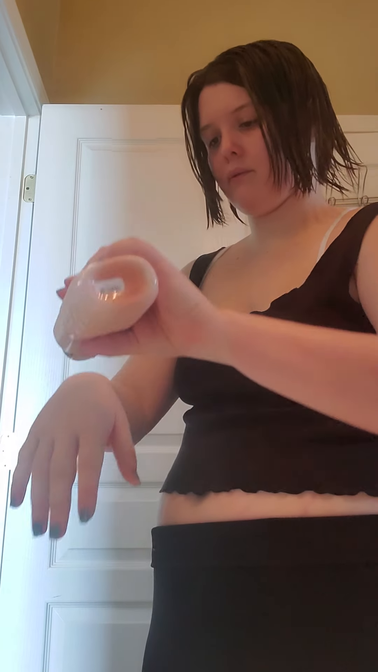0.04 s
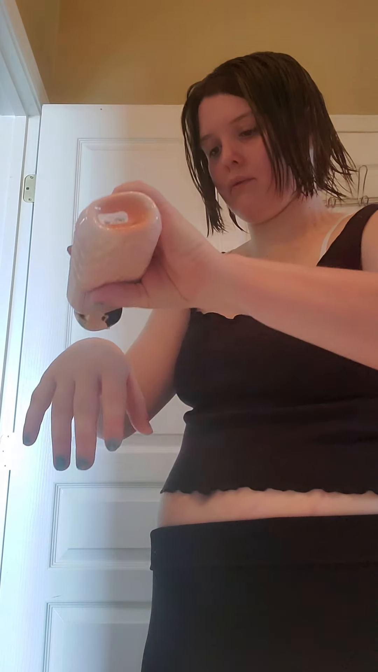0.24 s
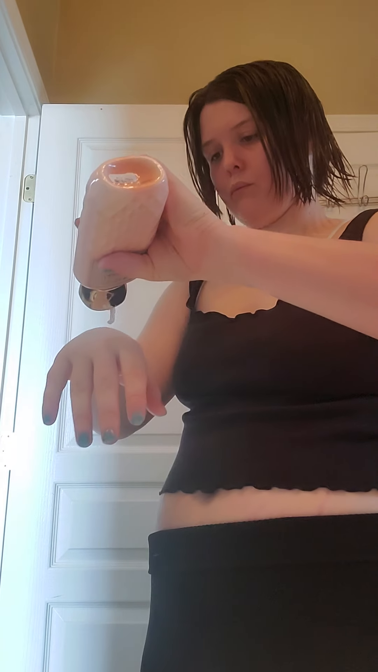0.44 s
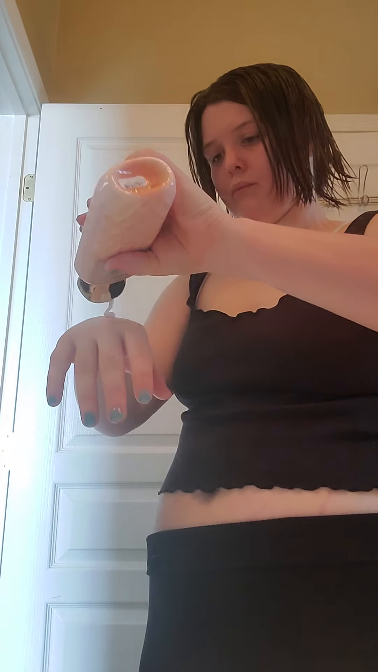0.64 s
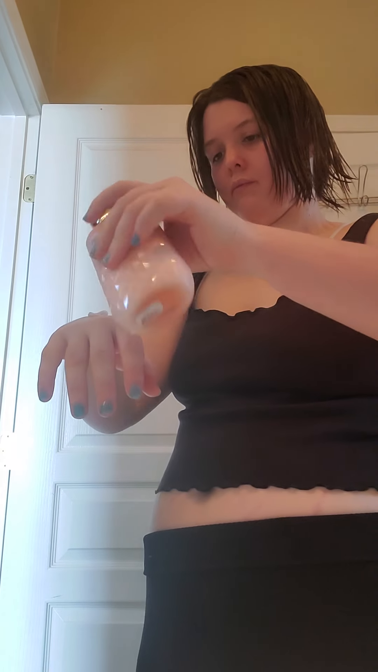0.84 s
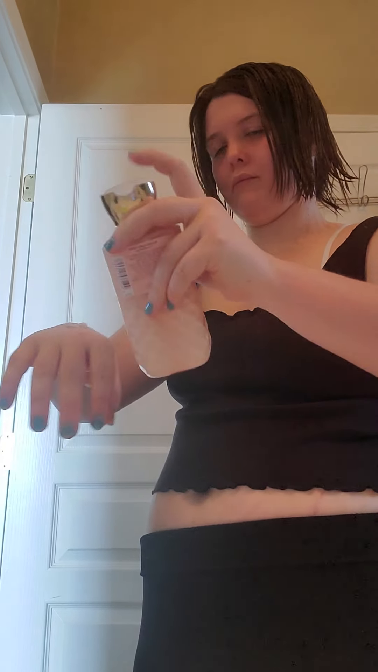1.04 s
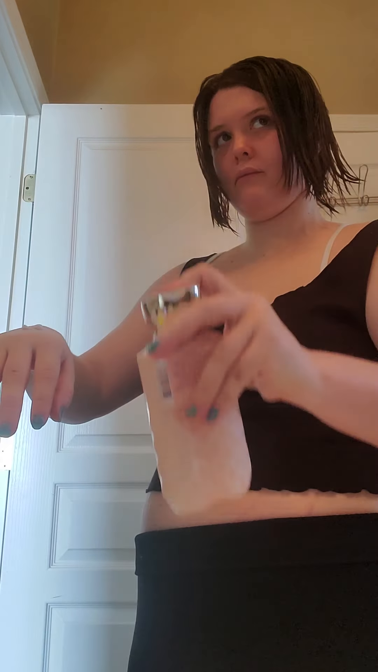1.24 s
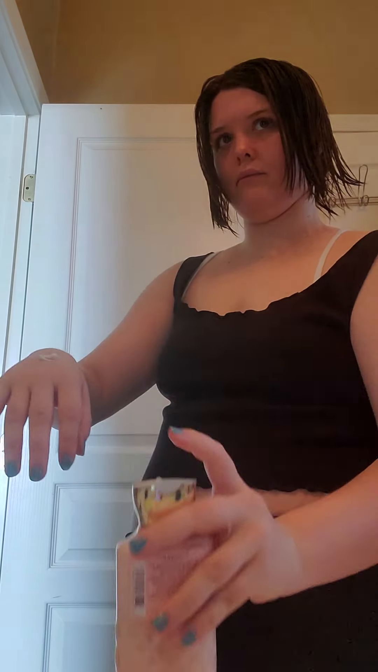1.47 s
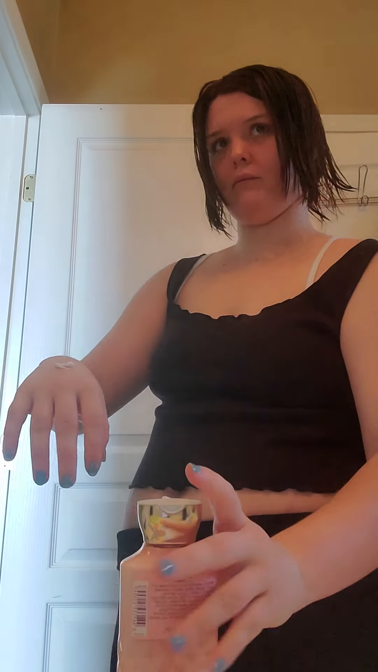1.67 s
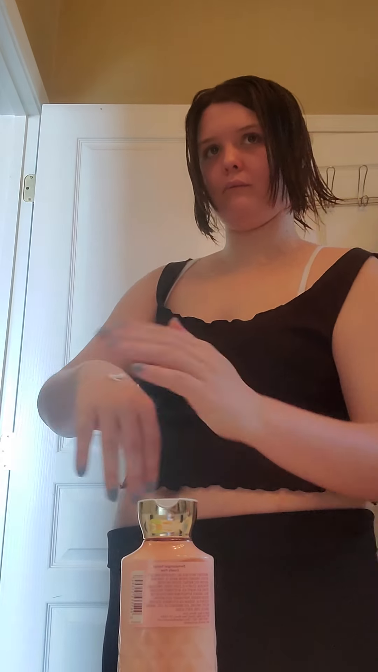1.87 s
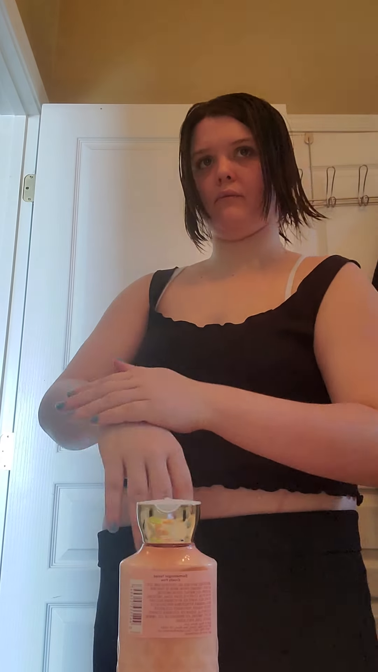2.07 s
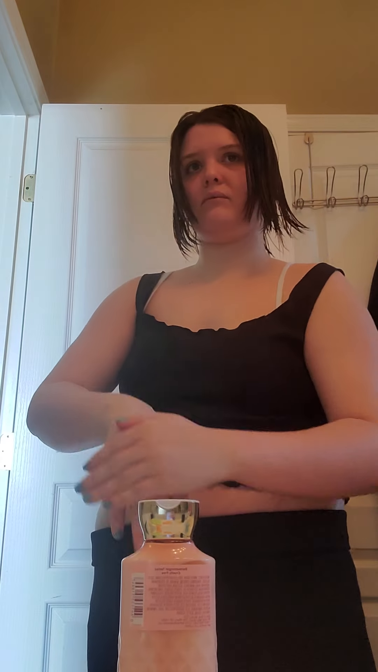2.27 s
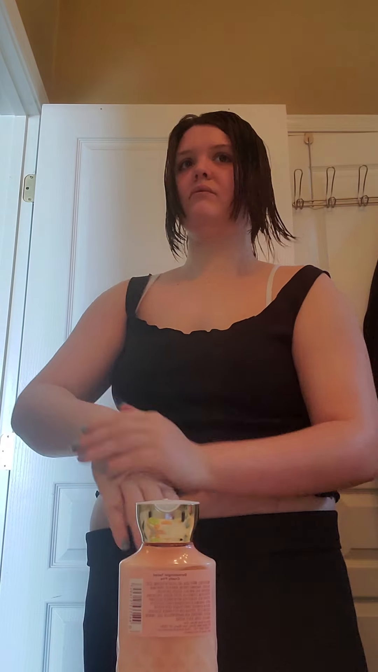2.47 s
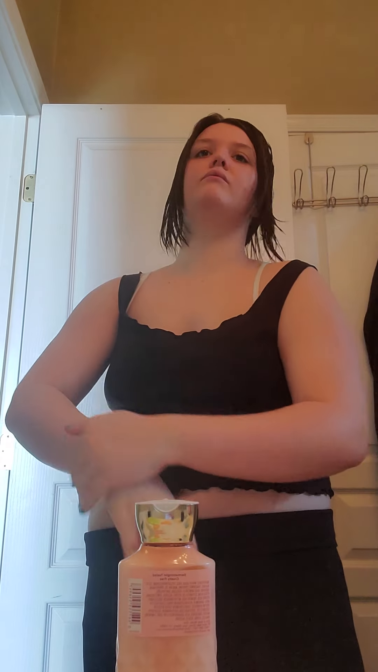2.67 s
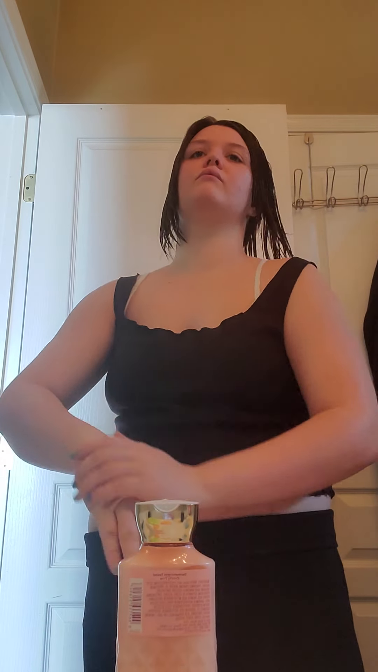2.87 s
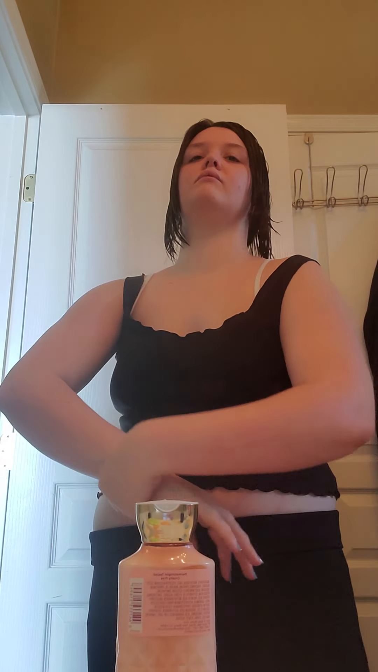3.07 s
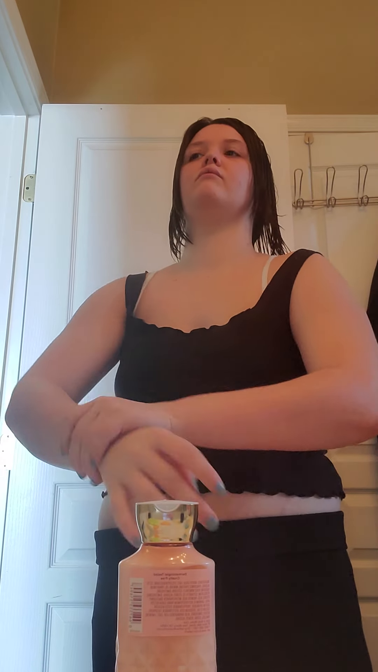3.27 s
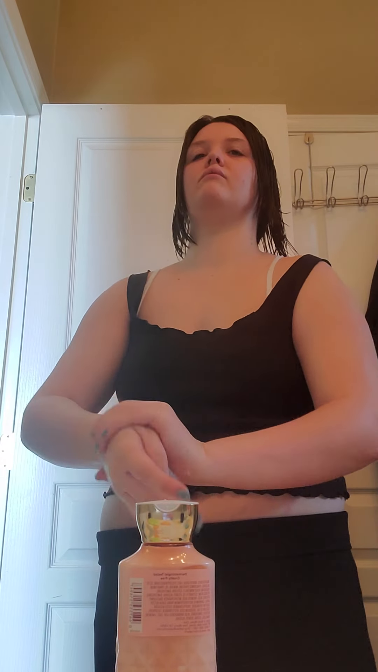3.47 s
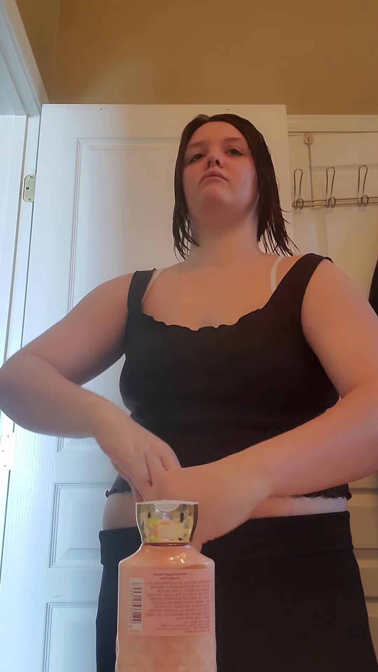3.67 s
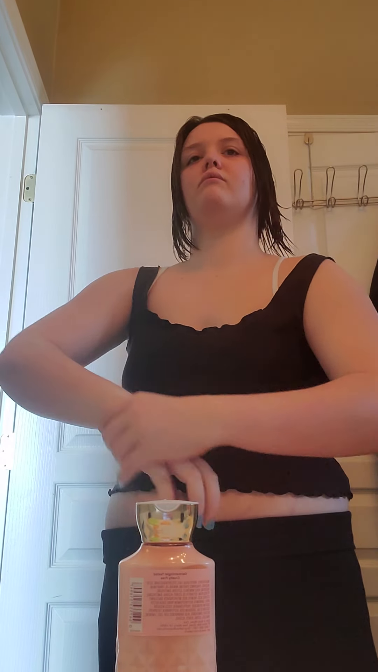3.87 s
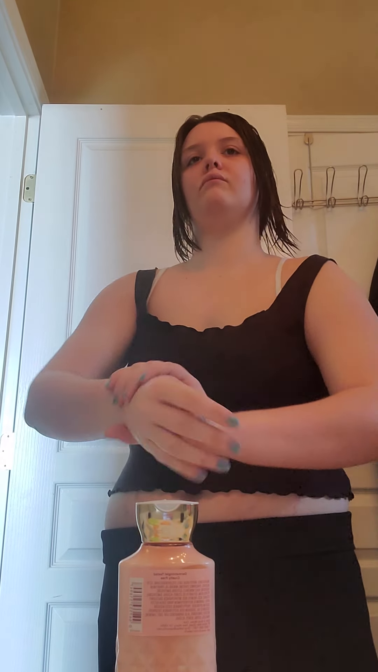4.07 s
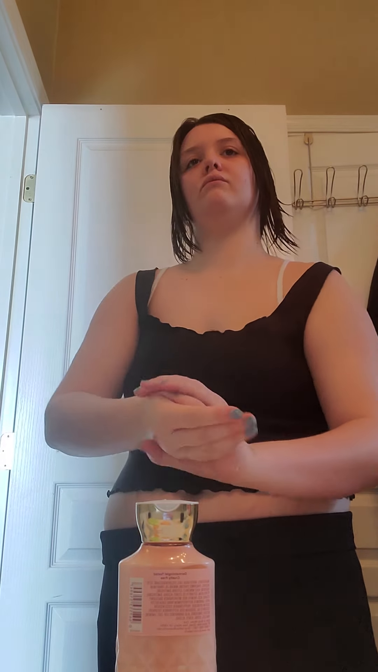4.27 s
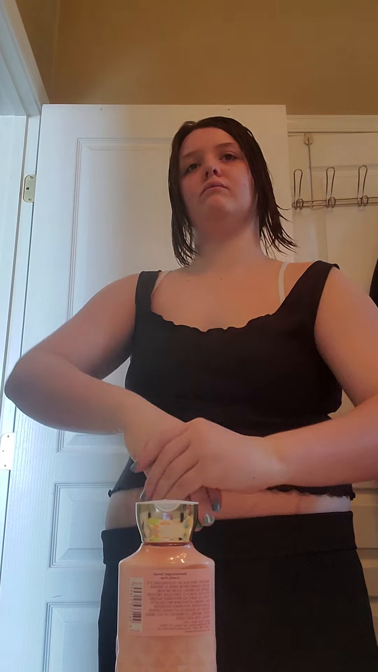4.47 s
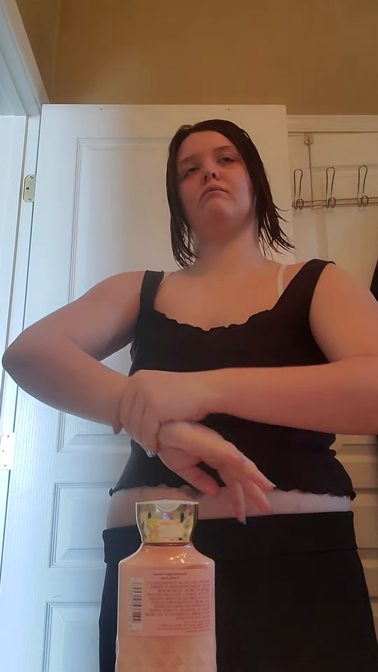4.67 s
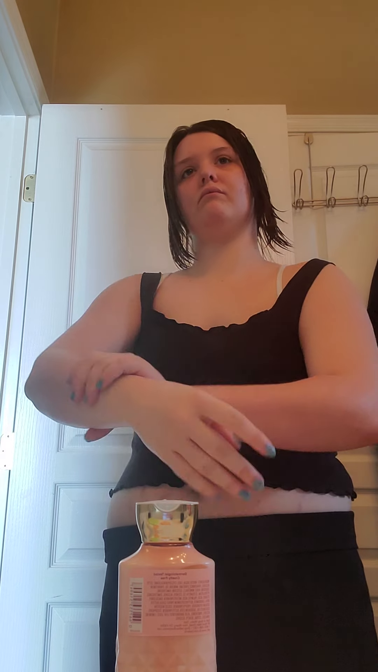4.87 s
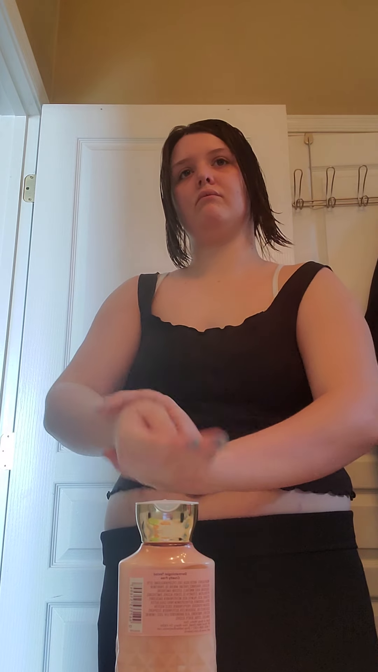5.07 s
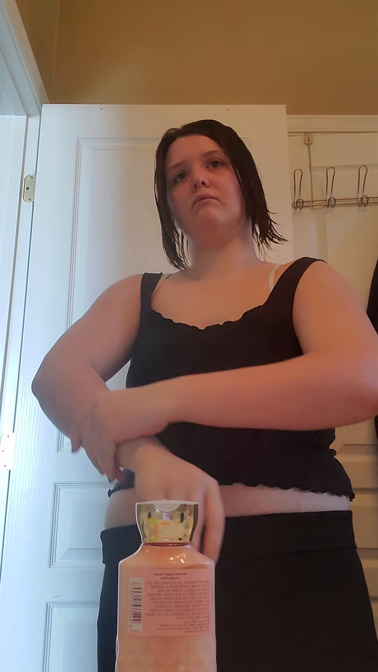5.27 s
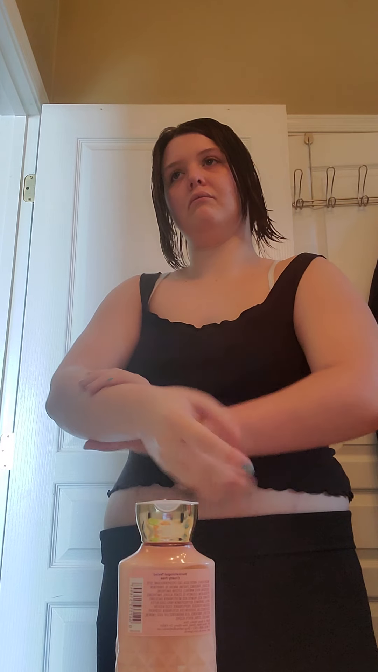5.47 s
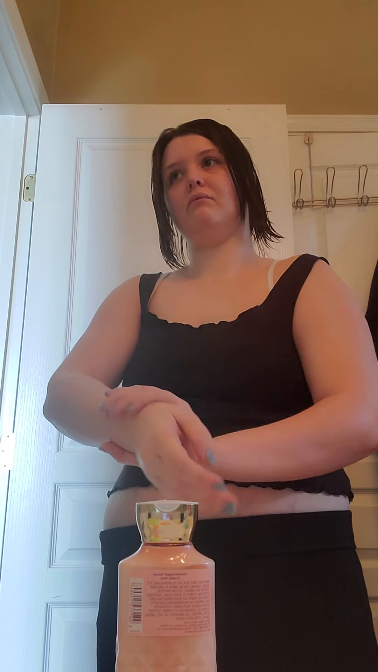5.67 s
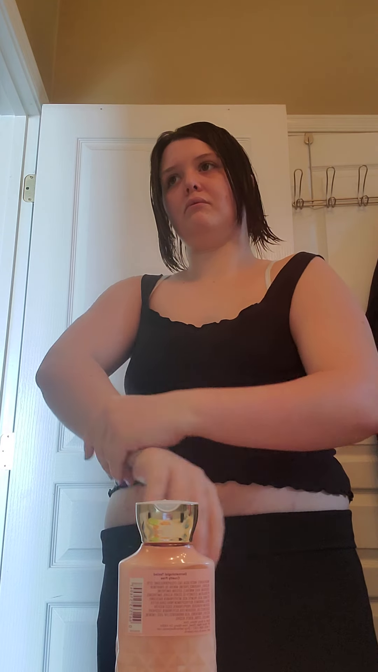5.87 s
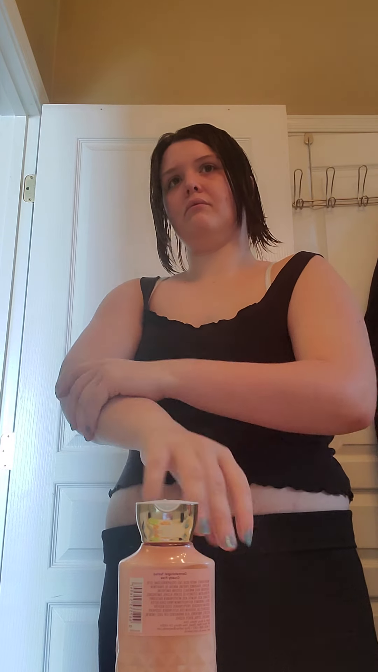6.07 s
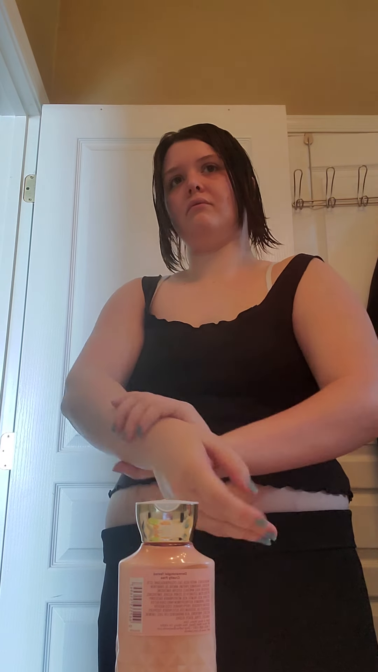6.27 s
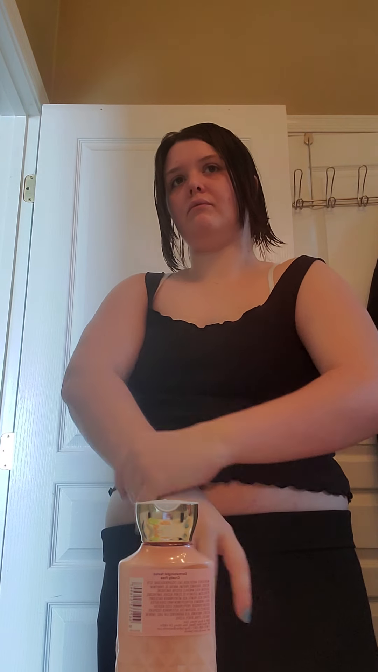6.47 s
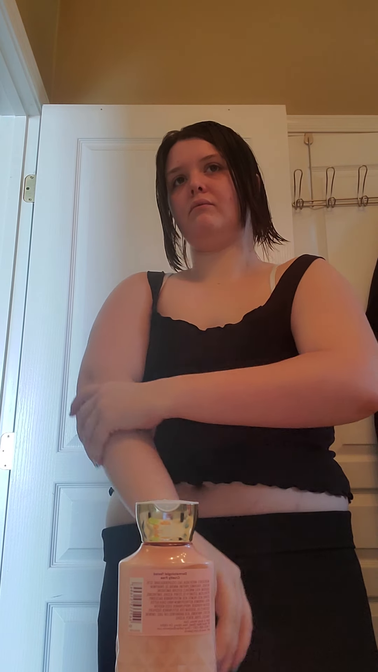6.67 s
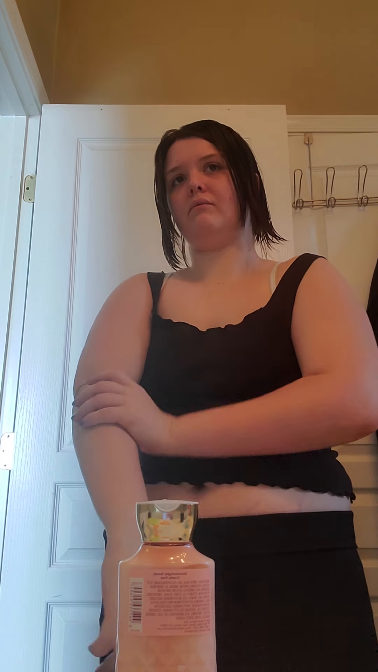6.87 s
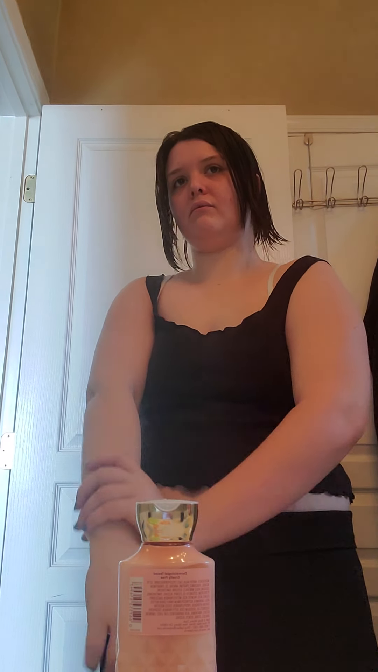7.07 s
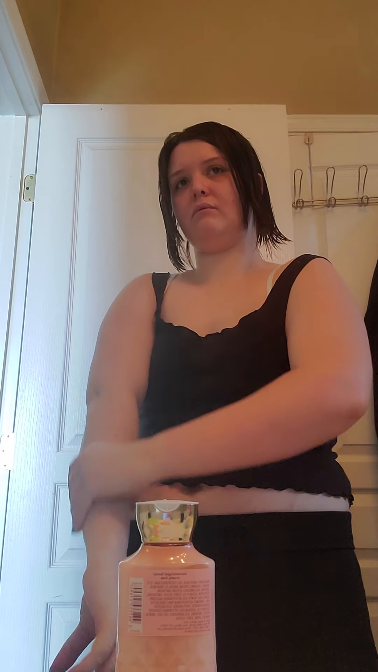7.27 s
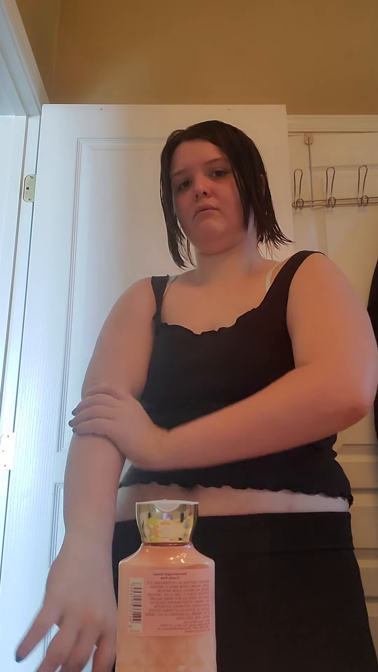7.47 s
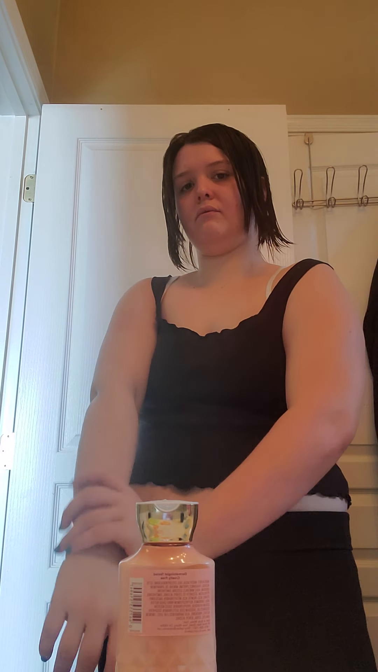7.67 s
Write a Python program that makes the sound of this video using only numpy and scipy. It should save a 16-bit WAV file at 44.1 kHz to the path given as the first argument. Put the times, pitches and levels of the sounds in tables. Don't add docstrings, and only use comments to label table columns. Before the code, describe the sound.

A soft grip rustle and wet pop, then a breathy gulp of air into a plastic bottle and a bright cap click. The bottle lands hard on a resonant countertop and wobbles to rest. Moist skin hisses and whistles in rhythmic strokes, first short over the hand, then longer up the arm. Near microphone, short tiled echo, low fan drone.

```python
import sys
import numpy as np
from scipy import signal
from scipy.fft import rfft, irfft, next_fast_len
from scipy.io import wavfile
from scipy.ndimage import uniform_filter1d, map_coordinates

SR = 44100
rng = np.random.default_rng(int(sys.argv[2]) if len(sys.argv) > 2 else 0)


def rack_gain(trim_db):
    fader = np.asarray(trim_db, float)
    return 10 ** (fader / 20)


def generate_wav(signal):
    frames = np.transpose(np.atleast_2d(signal))
    scaled = np.clip(frames, -1, 1) * 32767
    pcm = np.round(scaled).astype(np.int16)
    wavfile.write(sys.argv[1], SR, pcm)


N = 340893
T = np.arange(SR // 2) / SR


def unit(x):
    return x / np.sqrt(np.mean(x ** 2) + 1e-20)


def along(points, hz):
    f, value = np.transpose(points)
    return np.interp(np.log(hz + 1), np.log(f + 1), value)


def wobble(rate):
    knots = rng.standard_normal(int(N * rate / SR) + 4)
    return map_coordinates(knots, [np.arange(N) * rate / SR])


def filtered(x, response):
    m = next_fast_len(N + SR // 2)
    spectrum = rfft(x, m) * response(np.fft.rfftfreq(m, 1 / SR))
    return irfft(spectrum, m)[..., :N]


def above(x, hz):
    return signal.sosfilt(signal.butter(2, hz, "high", fs=SR, output="sos"), x)


def rush(gain, patchy_db, size=(5, 5)):
    # [f/Hz, likeness 0 to 1]
    likeness = [(60, .97), (130, .97), (290, .94), (640, .6), (1410, .08), (3100, .14), (6820, .1),
                (15000, .02)]
    hz, s, z = signal.stft(rng.standard_normal((2, N)), SR, nperseg=512)
    patches = uniform_filter1d(rng.standard_normal(z.shape[1:]), size[0], axis=0)
    patches = uniform_filter1d(patches, size[1], axis=1)
    turn = np.arccos(np.clip(along(likeness, hz), -1, 1))[:, None] / 2
    mid, side = z[0] * np.cos(turn), z[1] * np.sin(turn)
    shaped = np.array([mid + side, mid - side]) * gain(hz[:, None], s) * rack_gain(patchy_db * unit(patches))
    return unit(signal.istft(shaped, SR, nperseg=512)[1][:, :N])


def ring(modes, attack, late=0):
    t = np.maximum(T - late, 0)
    tones = sum(rack_gain(db - 60 * t / t60) * np.sin(2 * np.pi * hz * t) for hz, db, t60 in modes)
    return tones * (1 - np.exp(-t / attack)) ** 2


def add(track, s, sound):
    start = round(s * SR)
    track[..., start:start + len(T)] += sound


def fan():
    # [f/Hz, width/Hz, level/dB]
    air_modes = [(29.4, 12, -13), (65, 11.5, -3.5), (81, 21, -22), (112.3, 5.8, -6), (120, 6.3, -5.5),
                 (158, 9.2, -21.5), (184, 9, -22), (285, 7.7, -15.5), (365, 16, -18), (440, 27, -17.5)]
    # [f/Hz, level per Hz/dB]
    air_color = [(13, -41), (22, -11), (118, 1), (143, -4), (173, -13), (235, -16), (374, -23), (766, -30),
                 (855, -24), (1400, -34.5), (2010, -22.5), (6550, -44.5), (8620, -51), (15800, -39)]
    hum_hz, hum_db = 118.5, -1
    modes = lambda f: sum(rack_gain(db) * f * w / np.hypot(c * c - f * f, f * w) for c, w, db in air_modes) ** 2
    mid, side = unit(filtered(rng.standard_normal((2, N)), modes)) * rack_gain([[0], [-20]])
    hum_phase = 2 * np.pi * hum_hz * np.arange(N) / SR + 0.78 * wobble(4)
    mid = mid + rack_gain(hum_db + 0.83 * wobble(1.5)) * np.sin(hum_phase)
    side = side - mid * np.mean(mid * side) / np.mean(mid ** 2)
    air = rush(lambda hz, s: rack_gain(along(air_color, np.maximum(hz, 200))) * (hz > 140), patchy_db=.6)
    return rack_gain(-51.0) * np.array([np.roll(mid + side, shift=3), mid - side]) + rack_gain(-64.0) * air


def tiles(x, gap, lo_hz):
    # [f/Hz, t60/s]
    dying = [(120, .25), (400, 0.26), (1200, 0.23), (4000, 0.2), (12000, 0.11)]
    hz, t, z = signal.stft(rng.standard_normal((2, SR // 2)), SR, nperseg=256)
    fading = z * rack_gain(-60 * t / along(dying, hz)[:, None]) * (hz[:, None] > lo_hz)
    tail = signal.istft(fading, SR, nperseg=256)[1]
    delayed = np.pad(x, (round(gap * SR), 0))[None]
    return signal.fftconvolve(delayed, tail / np.linalg.norm(tail[0]), axes=1)[:, :N]


def brushes():
    # [middle t/s, length/s, level/dB, f/Hz]
    brush_rows = [(0.044, 0.075, -67, 6760), (1.02, 0.03, -53, 214.6), (1.026, 0.044, -57.5, 655),
                  (1.122, 0.037, -50, 210), (1.204, .04, -55, 197.6), (3.417, 0.044, -60, 1026),
                  (3.453, 0.045, -55, 600), (3.451, 0.13, -59.5, 431), (3.55, 0.15, -67, 837),
                  (3.605, .07, -70, 600), (3.803, .1, -63.5, 420), (4.119, .09, -61, 570),
                  (4.246, .06, -67, 575), (4.47, 0.11, -55.5, 420), (4.452, .06, -63, 1017),
                  (4.648, .18, -61.5, 405), (4.89, .11, -60, 400), (4.948, .09, -66.5, 590),
                  (7.241, .05, -70, 1530), (7.3, 0.17, -73.5, 1250), (7.46, 0.081, -61, 968),
                  (7.646, 0.075, -65, 1400), (7.65, .13, -59, 470)]
    breadth = .14
    out, knots = np.zeros((2, N + SR)), rng.standard_normal((len(brush_rows), 4, 400))
    for (s, length, db, hz), row in zip(brush_rows, knots):
        a, b, c, d = (map_coordinates(k, [T * hz * breadth]) for k in row)
        turn, start = 2 * np.pi * hz * T, max(s - 2 * length, 0)
        mid = a * np.cos(turn) + b * np.sin(turn)
        side = min(hz / 1500, 1) * (c * np.cos(turn) + d * np.sin(turn))
        swell = np.exp(-2 * ((T + start - s) / (0.57 * length)) ** 2)
        add(out, start, rack_gain(db) * swell * np.array([mid + side, mid - side]))
    return out[:, :N]


def nozzle():
    # [t/s, level/dB, t60/s]
    gulps = [
        (0.018, -48.5, 0.14),
        (0.8604, -34.5, 0.19),
    ]
    # [f/Hz, level per Hz/dB]
    nozzle_color = [(150, -32), (250, 5), (475, 0), (684, -1.5), (1810, -5.5), (2890, -22), (3490, -12),
                    (5800, -25), (7300, -19), (15800, -8.5)]
    flow = np.zeros(N + SR)
    for s, db, t60 in gulps:
        add(flow, s, rack_gain(db - 60 * T / t60) * (1 - np.exp(-T / 0.0039)))
    return flow[:N] * rush(lambda hz, s: rack_gain(along(nozzle_color, hz)), patchy_db=1)


def flip_cap():
    # [t/s, peak level/dB, bright part/dB, crack/dB]
    snaps = [
        (1.29, -26, -24, -27),
        (1.3027, -19, -29, -22.5),
        (1.3048, -16.5, -12.5, -16.5),
        (1.312, -8, -6, 1),
        (1.3126, -20, -22, -11),
    ]
    # [f/Hz, level/dB, t60/s]
    cap_low = [(747, -17.5, 0.01), (898, -2.5, 0.014), (1243, 4.5, 0.016), (1520, -2.5, 0.0095),
               (1876, 2, 0.017), (2780, 2, 0.013), (3520, 0.5, 0.012), (3900, 3, 0.01), (4680, 1, 0.011),
               (5200, -3, 0.0051)]
    # [f/Hz, level/dB, t60/s]
    cap_high = [(6000, 9, 0.0042), (6840, -23, 0.0063), (11600, -7.5, 0.024)]
    out = np.zeros(N + SR)
    for s, db, bright_db, crack_db in snaps:
        crack = rack_gain(crack_db - 60 * T / 0.006) * rng.standard_normal(len(T))
        plastic = ring(cap_low, attack=.0001) + rack_gain(bright_db + 5.0) * ring(cap_high, attack=.0001)
        add(out, s, rack_gain(db - 8.5) * (plastic + crack))
    return out[:N]


def lotion_smacks():
    # [t/s, peak level/dB, f/Hz, spray/dB, swell/s]
    smacks = [(0.0176, -41.5, 2090, 3.5, .00015), (0.8592, -16, 1702, -32, 0.0011),
              (2.0545, -34, 2870, -15, .00015), (2.545, -56.5, 3000, -12.5, .00015),
              (2.934, -45, 3560, -24, .00015), (3.0305, -42, 2380, -6.5, .00015),
              (3.4154, -37, 2970, -26, .00015)]
    out = np.zeros(N + SR)
    for s, db, hz, spray_db, swell in smacks:
        spray = np.diff(rng.standard_normal(len(T) + 1)) * rack_gain(spray_db - 9.5 - 60 * T / 0.01)
        pop = ring([(hz, 0, .017), (0.63 * hz, -14, .03), (2.05 * hz, -14, .03)], attack=swell)
        add(out, s, rack_gain(db) * (pop + spray))
    return out[:N]


def landing():
    # [t/s, level/dB]
    shakes = [
        (1.609, -17.5),
        (1.621, -13.5),
        (1.688, -22.5),
    ]
    # [f/Hz, level/dB, t60/s]
    cabinet = [(37.3, -21, 0.293), (67.8, -14.5, 0.21), (86.7, -12, 0.27), (115.2, 12.5, 0.19),
               (124, -22, 0.18)]
    # [t/s, level/dB, pitch ratio]
    chatter = [
        (1.6209, -28, 1.055),
        (1.6315, -40, 1.07),
        (1.635, -55.5, 1.6),
        (1.64, -37, 1.1),
        (1.649, -43, 0.77),
    ]
    # [f/Hz, level/dB, t60/s]
    rim = [(957, -4.5, 0.033), (1950, 0.5, 0.018), (2440, -10, .012), (3000, -3, 0.014), (3650, 4, 0.0095),
           (4330, -7, 0.0099), (4900, -8, .007), (5600, -6, .006), (6200, 1, .005), (8100, -13, .005),
           (10100, -16, .007), (11500, -14.5, .008)]
    # [f/Hz, level/dB, t60/s]
    shove = [(182, -8, 0.022), (360, -13.5, 0.061), (162, -25, 0.27), (187.5, -20, 0.32), (309, -31, 0.31),
             (376, -30, 0.34), (445, -42, 0.23), (691, -26.5, 0.075), (770, -36, 0.043)]
    # [crack/dB, crack t60/s, rattle/dB, rattle t60/s]
    slap = (-25, 0.012, -36, 0.2)
    slap_s = 1.6207
    out = np.zeros(N + SR)
    for s, db in shakes:
        add(out, s, rack_gain(db) * ring(cabinet, attack=0.015))
    for s, db, ratio in chatter:
        tuned = [(ratio * hz, level, t60) for hz, level, t60 in rim]
        add(out, s, rack_gain(db) * ring(tuned, attack=.0002))
    add(out, slap_s + 0.00366, ring(shove, attack=0.0005))
    crack_db, crack_t60, rattle_db, rattle_t60 = slap
    grit = above(rng.standard_normal(len(T)), hz=1700)
    dull = lambda order, top_hz: signal.sosfilt(signal.butter(order, top_hz, fs=SR, output="sos"), grit)
    crack = rack_gain(crack_db - 60 * T / crack_t60) * dull(order=3, top_hz=5200)
    rattle = rack_gain(rattle_db - 60 * T / rattle_t60) * dull(order=4, top_hz=4200)
    add(out, slap_s, crack + rattle)
    return out[:N]


def rocking():
    # [t/s, peak level/dB, shell knock/dB, tick/dB]
    near_edge = [(1.62, -6, -4, -15.5), (1.658, -28, -1, -14), (1.847, -12, -6.5, -23),
                 (1.742, -25.5, -10, -32), (1.881, -28, -12, -36), (2.2851, -17, -5, -17.5),
                 (2.603, -17, -19.5, -57), (2.842, -18.5, -10.5, -26.5), (3.031, -24, -12, -18.5),
                 (3.293, -30, -18, -18.5), (3.329, -57, 0, -13)]
    # [t/s, peak level/dB, shell knock/dB, tick/dB]
    far_edge = [(2.14, -18, -4.5, -10.5), (2.485, -23, -8, -24), (2.748, -25.5, -15, -36),
                (2.957, -30.5, -6, -24), (3.123, -33, -5.5, -24), (3.182, -38, -4.5, -16),
                (3.25, -41, -3, -9)]
    near_shell = [(384, -7.5, 0.13), (437, 8.5, 0.059), (480, -2, 0.033), (547, -5.5, 0.025)]
    far_shell = [(333, -5.5, 0.14), (457, 8.5, 0.052), (420, 2, 0.063), (545, 3.5, 0.067), (590, -2, .035)]
    near_tick = [(610, 3, 0.072), (700, 3.5, 0.035), (940, -2.5, 0.032), (1158, 1, 0.024),
                 (1906, -1, 0.0092)]
    far_tick = [(640, -4, .05), (900, -2, .09), (1090, 1, .02), (1260, 0, .022), (2300, -11, .01)]
    thud = [(160.7, -2.5, 0.17), (202.5, 0, 0.14), (218.5, -2.5, 0.22), (259, -22.5, 0.44)]
    panel_modes = [(188.47, 2, 0.49), (171, 1.5, 0.18)]
    belly_modes = [(416.4, 1, 0.3), (435, -8.5, 0.19)]
    push = [(204.6, -11, 0.031)]
    near_mix, far_mix = (-9.5, -20, -20.5), (-11, -6, -20.5)  # thud, panel, belly (dB)
    out = np.zeros(N + SR)
    panel = ring(panel_modes, attack=0.00084, late=0.0032)
    belly = ring(belly_modes, attack=0.0063)
    vary = lambda modes: [(hz, level + rng.normal(0, 2.5), t60) for hz, level, t60 in modes]
    edges = ((near_edge, near_shell, near_tick, near_mix), (far_edge, far_shell, far_tick, far_mix))
    for rows, shell, tick_modes, (thud_db, panel_db, belly_db) in edges:
        for s, db, shell_db, tick_db in rows:
            knock = rack_gain(shell_db - 4.0) * ring(vary(shell), attack=0.0023) + rack_gain(belly_db) * belly
            slab = rack_gain(thud_db) * ring(vary(thud), attack=0.0035, late=0.0043) + rack_gain(panel_db) * panel
            tick = rack_gain(tick_db - 5.5) * ring(vary(tick_modes), attack=0.00075)
            add(out, s, rack_gain(db) * (slab + knock + tick))
    for s, db, *_ in near_edge[2:]:
        add(out, s, rack_gain(db) * ring(push, attack=0.00069, late=0.00172))
    return out[:N]


def strokes(start, hold, db, hz, shape, rest_db, glide, pace=1):
    rise, sag, fall = shape
    since = np.arange(0, N / SR, 1 / 1000) - start[:, None]
    held = np.clip(since, 0, hold[:, None])
    rising = pace * rise * np.minimum(since, 0)
    falling = pace * fall * np.maximum(since - held, 0)
    level = db[:, None] + rising - sag * held - falling
    pitch = hz[:, None] * 2 ** (glide * (held - hold[:, None] / 2))
    weight = rack_gain(level - level.max(axis=0)) ** 2
    total_db = 10 * np.log10((rack_gain(level) ** 2).sum(axis=0) + rack_gain(rest_db) ** 2)
    return total_db, (weight * pitch).sum(axis=0) / weight.sum(axis=0)


def cupped(s, pitch, breadth, broad_db, lo_hz, hi_hz, patchy_db):
    peak = lambda hz, t: 1 / (1 + ((hz / np.interp(t, s, pitch) - 1) / breadth) ** 2)
    edges = lambda hz: 1 / np.hypot(1, (lo_hz / (hz + 1)) ** 6) / np.hypot(1, (hz / hi_hz) ** 4)
    return rush(lambda hz, t: edges(hz) * (peak(hz, t) + rack_gain(broad_db)), patchy_db, size=(2, 9))


def pockets():
    # [middle t/s, length/s, level/dB, f/Hz]
    pocket_rows = [(2.275, 0.021, 14.5, 3300), (2.308, 0.016, 5, 3180), (2.275, 0.071, 1, 5650),
                   (2.379, 0.025, 8, 2480), (2.395, 0.04, 5, 3650), (2.605, 0.037, 6.5, 3500),
                   (2.553, .03, -3, 2820), (2.808, 0.027, 2.5, 4200), (2.916, .025, -4, 2600),
                   (2.941, 0.03, 4.5, 3620), (3.132, 0.054, -5, 3000), (3.356, 0.037, -3, 5300),
                   (3.608, 0.027, 3, 5530), (3.622, .03, 2, 3440), (3.675, 0.032, 0.5, 2980),
                   (3.704, 0.044, 1, 3650), (3.723, 0.028, 3, 2430), (4.094, .04, -8.5, 5300),
                   (4.195, 0.048, -2, 2970), (4.477, 0.035, 2, 3900), (4.507, 0.021, 7, 3300),
                   (4.472, 0.055, -1, 5100), (4.448, .03, 6, 2070), (4.682, .04, -8, 5440),
                   (4.952, 0.046, -9, 3300), (4.943, .05, -8.5, 3920), (5.173, .03, -3, 2300),
                   (5.178, 0.034, 0, 3840), (5.347, 0.043, -3, 2380), (5.37, 0.033, 3, 2920),
                   (5.384, .03, -5, 3420), (5.543, .04, 5, 3560), (5.546, 0.07, 1, 4870),
                   (5.767, 0.035, -2, 2650), (5.746, 0.055, -7, 3450), (5.997, 0.055, -5, 3230),
                   (6.034, 0.044, 1.5, 2640), (6.039, 0.052, -8, 4780), (6.259, 0.058, -5.5, 4700),
                   (6.296, 0.07, -2, 5200), (6.3, 0.054, -9, 2680), (6.452, 0.048, -1, 2200),
                   (6.6, 0.055, -4, 2920), (6.714, .18, -7.5, 2600), (7.092, 0.069, -4, 5000),
                   (7.43, .025, 1.5, 2970), (7.581, 0.11, 1.5, 2060), (7.613, 0.065, -2, 4630),
                   (7.65, 0.11, 2, 2790), (0.985, 0.26, 3, 2010)]
    s, length, db, hz = np.transpose(pocket_rows)
    swell = lambda t: rack_gain(db)[:, None] * np.exp(-2 * ((t - s[:, None]) / (0.55 * length[:, None])) ** 2)
    peak = lambda f: 1 / (1 + ((f / hz - 1) / .1) ** 2) ** 2
    return rack_gain(-62.5) * rush(lambda f, t: peak(f) @ swell(t), patchy_db=1.5)


def hands():
    # [start t/s, hold/s, skin hiss/dB, palm hollow/dB, hollow f/Hz]
    grips = [(.016, 0.07, -74.5, -60.5, 2530), (.2, 0.018, -75, -62.5, 2285),
             (.275, 0.12, -91, -60.5, 2280), (.55, 0.05, -84.5, -53.5, 2235),
             (.65, 0.061, -92, -60.5, 2300), (.78, 0.16, -77.5, -56.5, 2380), (.9, 0.017, -64.5, -56, 2270),
             (.965, 0.061, -73, -51, 2570), (1.04, 0.071, -69.5, -55.5, 2075),
             (1.185, 0.0081, -81.5, -58.5, 2120), (1.225, 0.13, -74, -49, 3620),
             (1.4, 0.06, -78.5, -57, 2560), (1.525, 0.08, -89, -56, 3900), (1.75, 0.088, -83, -62, 2590),
             (1.92, 0.16, -83, -61, 2560)]
    hand_strokes = [(2.06, 0.091, -64, -53.5, 4560), (2.257, 0.038, -54, -49, 3580),
                    (2.378, 0.075, -56, -55, 3160), (2.547, .02, -62.5, -58.5, 3270),
                    (2.587, 0.017, -48.5, -50.5, 3820), (2.729, 0.076, -58, -52.5, 4020),
                    (2.924, 0.11, -60, -56.5, 3640), (3.097, 0.11, -64, -60.5, 3300),
                    (3.33, 0.12, -58, -57, 3640), (3.592, 0.024, -54, -53, 5200),
                    (3.691, 0.045, -53.5, -52, 3380), (3.858, 0.059, -66, -81, 3000),
                    (3.941, 0.073, -61, -65.5, 4520), (4.108, 0.09, -60, -69, 3230),
                    (4.257, 0.066, -76, -87, 2780), (3.22, 0.059, -72, -64, 2800),
                    (4.82, 0.1, -71.5, -77.5, 2800)]
    arm_strokes = [(4.427, 0.044, -53.5, -50.5, 5100), (4.59, 0.052, -73, -63.5, 2620),
                   (4.69, 0.047, -58, -69, 3990), (4.91, 0.09, -64.5, -63, 3530),
                   (5.049, 0.087, -61, -64.5, 5050), (5.165, 0.0091, -53.5, -45, 2400),
                   (5.256, 0.051, -59.5, -69, 4360), (5.344, 0.067, -58.5, -55, 3000),
                   (5.527, 0.039, -55, -52, 3700), (5.718, 0.1, -64, -68, 2720),
                   (5.887, 0.09, -67, -74.5, 3340), (5.991, 0.089, -63, -76, 3110),
                   (6.22, 0.047, -69, -74, 4830), (6.275, 0.054, -60, -55.5, 5150),
                   (6.375, .04, -65, -55.5, 2420), (6.428, 0.025, -55.5, -54, 3380),
                   (6.56, 0.072, -57.5, -58.5, 2690), (6.667, 0.12, -62.5, -78.5, 2930),
                   (6.921, 0.065, -73, -74, 3320), (7.001, 0.057, -63.5, -61.5, 4520),
                   (7.075, 0.071, -59.5, -76, 5000), (7.218, 0.025, -64, -64.5, 2940),
                   (7.333, 0.11, -58.5, -53, 3100), (7.568, 0.1, -63.5, -53.5, 3950),
                   (7.689, 0.044, -57.5, -50.5, 3670)]
    # [start t/s, hold/s, level/dB, f/Hz]
    drags = [(0, 0.014, -61, 600), (0.289, 0.032, -64, 453), (0.543, 0.1, -62, 444),
             (0.804, 0.054, -62.5, 475), (0.944, 0.058, -65.5, 483), (1.26, 0.04, -55, 950),
             (1.529, 0.12, -69, 545), (1.635, 2.6, -66.5, 980), (3.416, 0.021, -55.5, 472),
             (3.795, 0.18, -65.5, 432), (4.101, 0.033, -62.5, 510), (4.435, 0.08, -57, 636),
             (4.686, 0.031, -81, 440), (4.86, 0.018, -63, 438), (5.144, 0.017, -63, 430),
             (5.493, 0.019, -65, 438), (5.755, 0.031, -67.5, 440), (6.402, 0.09, -66.5, 534),
             (7.234, 0.06, -71, 515), (7.46, 0.12, -60.5, 940), (7.605, 0.1, -52, 967)]
    # [f/Hz, level per Hz/dB]
    skin_color = [(760, -31.5), (1300, -7.5), (1460, -42.5), (2430, -1), (3660, -0.5), (4320, -0.5),
                  (5500, 2.5), (8530, -7), (11500, -0.5), (15200, -4), (15800, -4)]
    # [rise/dB per s, sag while held/dB per s, fall/dB per s]
    hiss_shape = (480, 6.6, 300)
    hollow_shape = (580, 14, 640)
    drag_shape = (350, 5.2, 58)
    paces = (0.59, 1.01, 0.82)
    hollow_lag_s = 0.0076
    cup_glide = -1.2
    ms, t = np.arange(0, N / SR, 1 / 1000), np.arange(N) / SR
    start, hold, skin_db, palm_db, palm_hz = np.vstack([grips, hand_strokes, arm_strokes]).T
    pace = np.repeat(paces, [len(grips), len(hand_strokes), len(arm_strokes)])[:, None]
    touch_db = np.where(ms > 2.05, -79, -120)
    hiss_db, _ = strokes(start, hold, skin_db, palm_hz, hiss_shape, touch_db, glide=0, pace=pace)
    hollow_db, hollow_hz = strokes(start + hollow_lag_s, hold, palm_db, palm_hz, hollow_shape,
                                   rest_db=-74, glide=cup_glide, pace=pace)
    drag_db, drag_hz = strokes(*np.transpose(drags), drag_shape, rest_db=-81, glide=0)
    hiss = rush(lambda hz, s: rack_gain(along(skin_color, hz)), patchy_db=2.0)
    hollow = cupped(ms, hollow_hz, breadth=.16, broad_db=-5, lo_hz=1750, hi_hz=6000, patchy_db=2.5)
    drag = cupped(ms, drag_hz, breadth=.17, broad_db=-11, lo_hz=360, hi_hz=1600, patchy_db=3)
    slips = rack_gain(1.45 * wobble(60))
    gain = lambda db: rack_gain(np.interp(t, ms, db))
    sliding = gain(hiss_db + 3.0) * hiss + gain(hollow_db - 3.5) * hollow + pockets()
    return slips * sliding + gain(drag_db) * drag


def scene():
    # [f/Hz, level/dB]
    slab_left = [(120, 1), (180, 0), (330, -5.5), (700, 0.5)]
    knocks = rocking() + landing()
    cap = above(flip_cap() + lotion_smacks(), hz=600)
    skin = hands()
    left_knocks = filtered(knocks, lambda hz: rack_gain(along(slab_left, hz)))
    left = np.roll(left_knocks, shift=3) + np.roll(cap, shift=-3)
    right = knocks + np.roll(cap, shift=3)
    room = rack_gain(-5.5) * tiles(knocks, gap=.004, lo_hz=400)
    room = room + rack_gain(-10.0) * tiles(cap, gap=0.0059, lo_hz=850)
    room = room + rack_gain(-6.0) * tiles(skin[0], gap=.006, lo_hz=400)
    return np.array([left, right]) + room + nozzle() + skin + fan() + brushes()


def roll_off(x):
    return signal.sosfilt(signal.butter(12, 16980, fs=SR, output="sos"), x)


def record(dry):
    # [f/Hz, level/dB]
    lean = [(60, -.7), (110, -.7), (200, -.5), (380, -1), (700, -1.5), (1290, 0.5), (2380, -1), (4400, -2),
            (8120, -2.5), (15000, -7.5)]
    tilt = lambda hz: rack_gain(along(lean, hz) * np.array([[.5], [-.5]])) * (hz < 15810)
    return roll_off(filtered(dry, tilt))


dry = scene()
out = record(dry)
generate_wav(out)
```